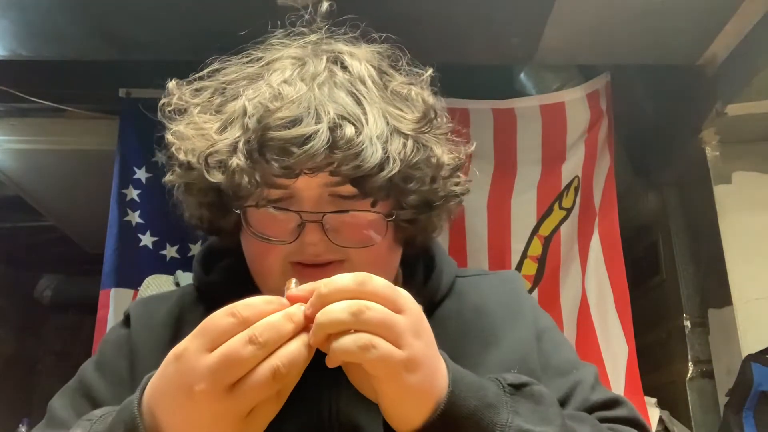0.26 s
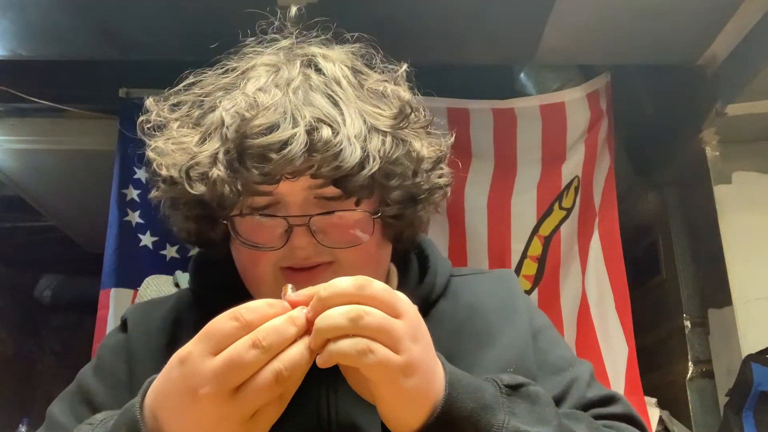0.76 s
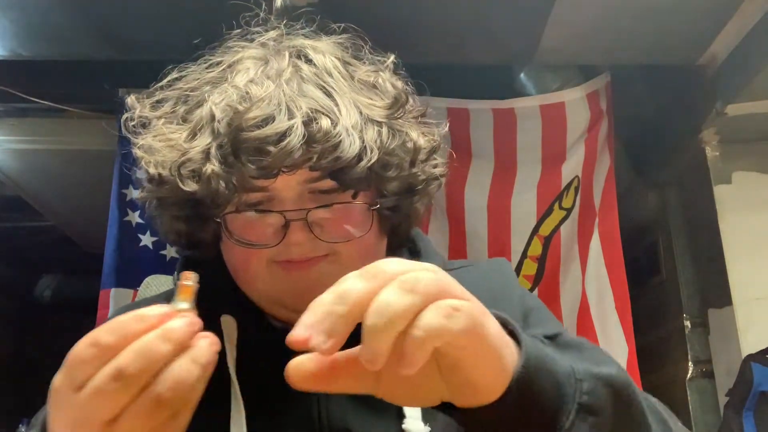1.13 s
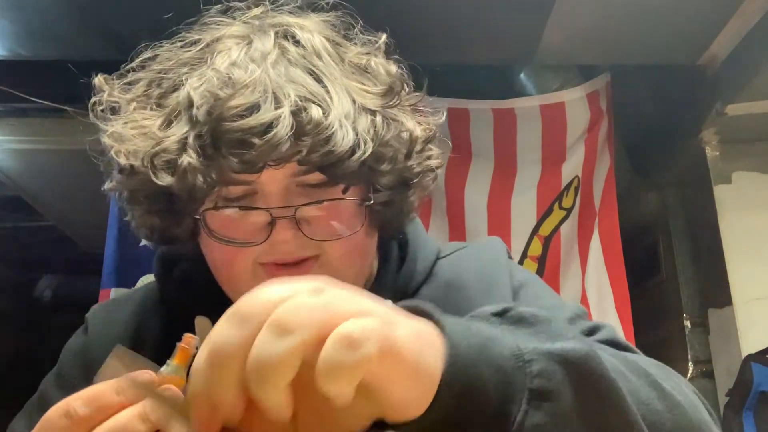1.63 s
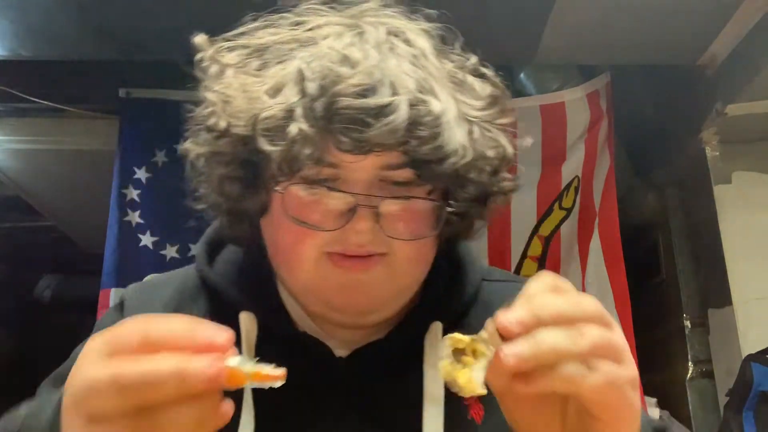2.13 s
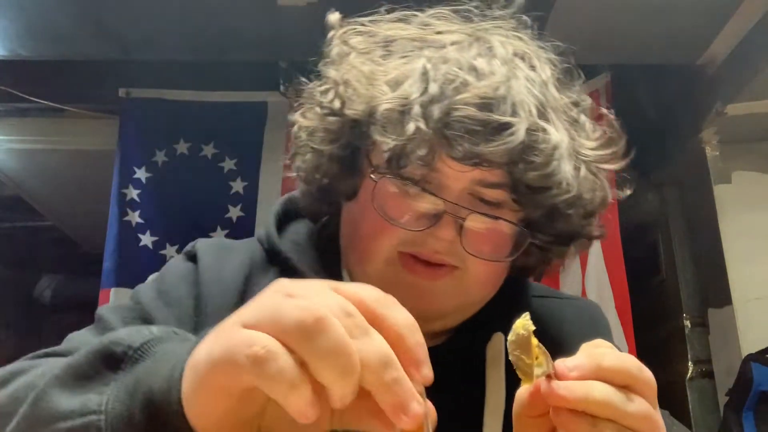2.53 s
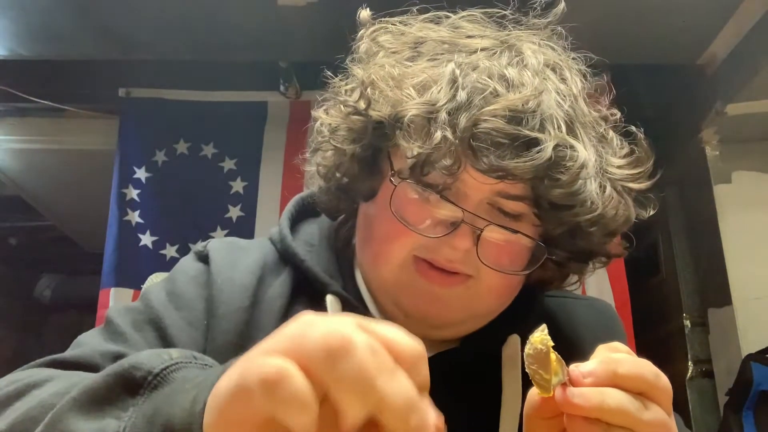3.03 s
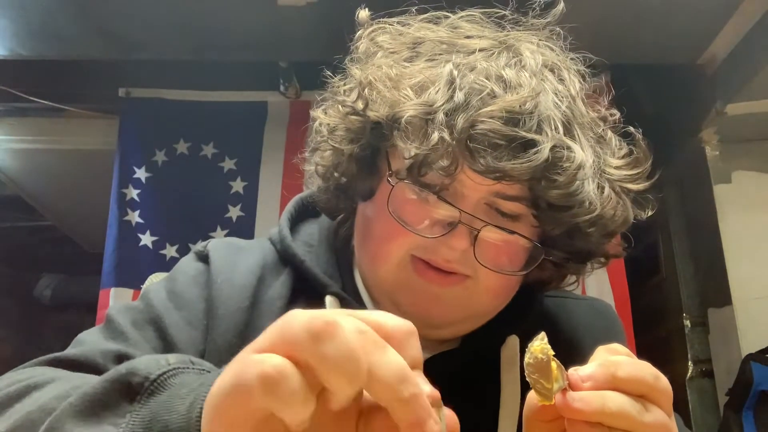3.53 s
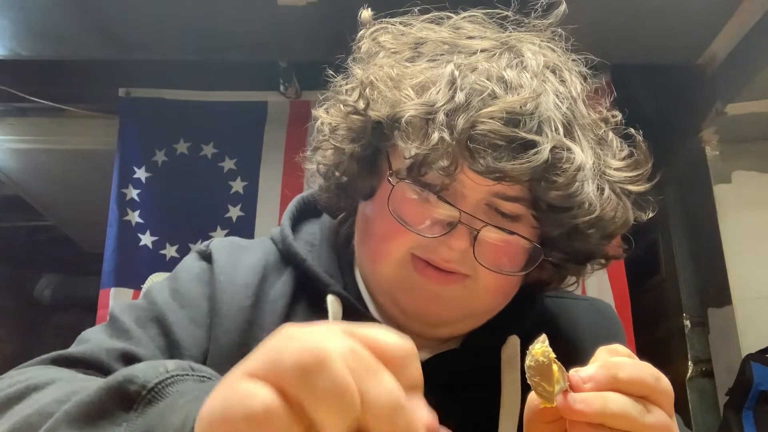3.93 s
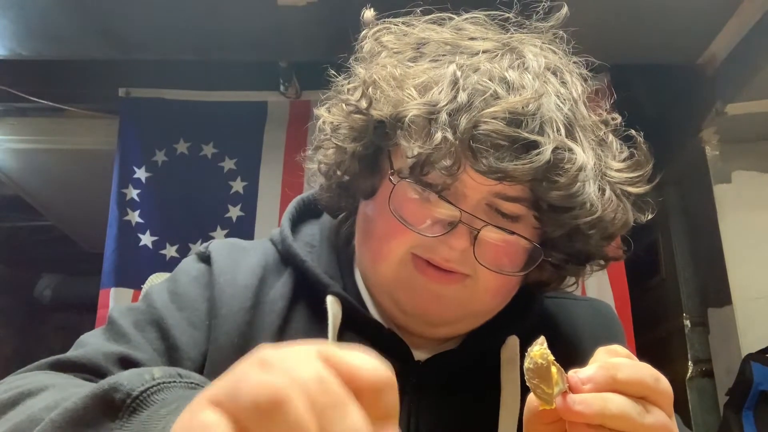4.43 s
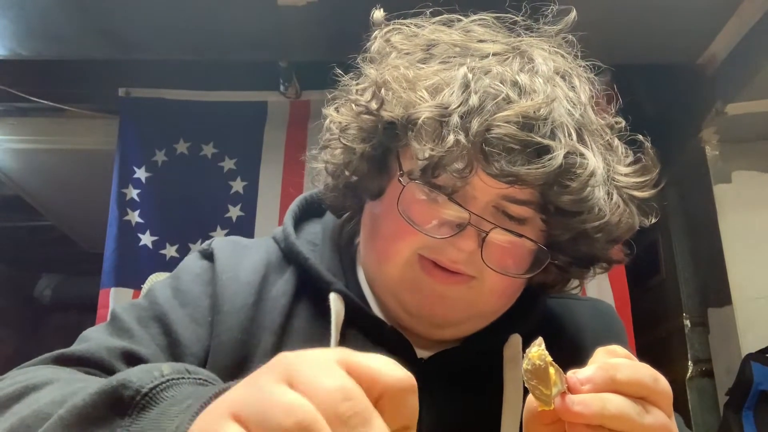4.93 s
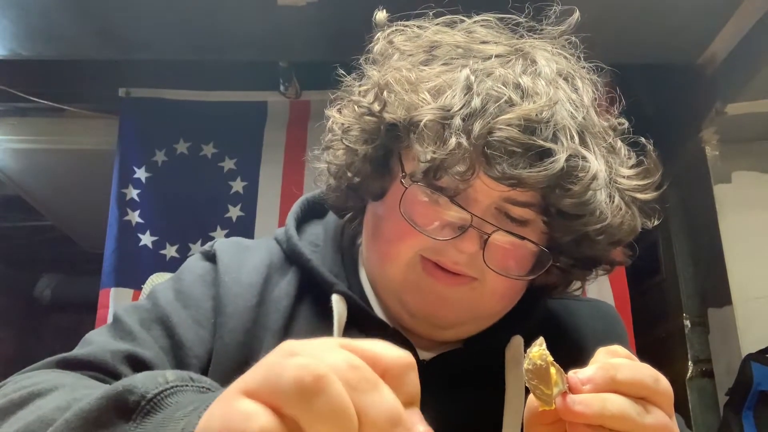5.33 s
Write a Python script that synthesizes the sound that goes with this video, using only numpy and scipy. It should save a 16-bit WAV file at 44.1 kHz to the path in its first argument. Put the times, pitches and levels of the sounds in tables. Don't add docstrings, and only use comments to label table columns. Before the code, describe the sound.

Quiet room with low rumble, small handling rustles and a faint bottle clink, then fourteen quick hard raps of a small object on a table.

```python
import sys
import numpy as np
from scipy import signal
from scipy.fft import rfft, irfft, next_fast_len
from scipy.io import wavfile
from scipy.ndimage import uniform_filter1d

SR = 44100
rng = np.random.default_rng(int(sys.argv[2]) if len(sys.argv) > 2 else 0)


def ratio_of_db(decibels):
    return 10 ** (np.asarray(decibels, float) / 20)


def inscribe(sig):
    pcm = np.round(np.clip(np.atleast_2d(sig).T, -1, 1) * 32767)
    wavfile.write(sys.argv[1], SR, pcm.astype(np.int16))


N = 245637
PAD = next_fast_len(N + SR)
HZ = np.maximum(np.fft.rfftfreq(PAD, 1 / SR), 1)

# frequency in Hz, level in dB per Hz.
RUMBLE = [(12, -43), (20, -12), (43, -1), (76, 4.5), (88, -9), (97, -24.5), (120, -39), (160, -58.5),
          (260, -120)]
HISS = [(60, -42), (100, -2), (315, -17), (600, -21.5), (1100, -24.5), (5400, -31), (8200, -31.5),
        (8500, -43.5), (9500, -45.5), (9800, -36), (14300, -37.5), (14800, -49.5), (17000, -63)]
RUMBLE_DB, HISS_DB = -66.5, -79.5
SWELLS_PER_S, SWELL_DB = 9, 3.5
# middle in seconds, length in seconds, peak in dB.
LEANS = [
    (1.04, 0.032, -57),
    (1.55, 0.51, -61.5),
    (2.72, .12, -62),
]

# middle in seconds, length in seconds, peak in dB.
BUMPS = [
    (1.18, 0.063, -76),
    (1.4, 0.045, -61.5),
    (1.49, 0.13, -57),
    (1.63, 0.19, -67),
    (2.05, 0.34, -66),
    (2.58, 0.07, -73),
    (2.72, 0.062, -74),
]
RUBS = [
    (1.42, 0.17, -72),
    (1.8, 0.22, -81),
    (2.14, 0.26, -77.5),
    (2.67, 0.13, -82),
]
SCUFFS = [
    (.89, .02, -84),
    (1.3, 0.08, -88),
    (1.4, 0.1, -76.5),
    (2.01, 0.087, -82),
    (2.4, 0.46, -93),
    (2.59, .06, -93),
    (2.67, 0.15, -80),
]
SWISHES = [
    (1.27, .12, -89),
    (1.39, .03, -86),
    (1.47, .08, -83),
    (2.67, .03, -90),
]
RESTLESS_DB = -96.5, -106, -101, -104

# frequency in Hz, level in dB, t60 in seconds.
ROOM = [(60, -14.5, 0.14), (153, -11, 0.42), (297, -10, 0.1), (467, -7, 0.12), (1500, -24, 0.2),
        (4200, -12, .18), (6760, -13.5, 0.14), (11500, -29.5, 0.11)]
# frequency in Hz, phase lead in radians.
PORT_PHASE = [(30, 0.18), (60, 0.42), (125, 1.4), (250, 2.5), (500, 2.15), (700, 1.8), (1100, 1.4),
              (1400, 0.9), (1800, 5.46), (2300, 6.93), (2800, 8.33), (4000, 4.17), (6400, 4.82),
              (9000, 3.8), (13000, 0.1)]
# frequency in Hz, left minus right in dB.
BALANCE_DB = [(40, -2), (80, -5), (140, -2), (200, -4), (300, -2), (800, -1), (1050, 8), (1800, 6),
              (2300, 7), (3200, 8), (4500, 3), (6000, 1), (16000, 0)]
LATE_CYCLES = 2.1

# start in seconds, peak in dB, pitch in Hz, t60 in seconds.
TAPS = [(0.887, -55, 1430, 0.043), (.885, -63, 3500, 0.011), (1.398, -45, 6300, 0.023),
        (1.698, -52, 8700, .015), (1.746, -57, 560, 0.079), (1.873, -49.5, 500, 0.036),
        (2.002, -74, 1300, 0.052), (2.125, -79.5, 513, .04), (2.591, -57, 890, 0.071),
        (2.662, -42, 837, 0.083), (2.689, -56, 1000, 0.11), (2.668, -62, 3100, 0.032)]
# frequency in Hz, level in dB, t60 in seconds.
CLINK = [(870, -3, .12), (1850, 0, .06), (2200, -14, .1), (3250, -8, .15), (4100, -7, .06), (5000, -1, .05),
         (5650, -4, .14), (6250, -2, .06), (8000, -16, .06)]
CLINK_S, CLINK_DB = 1.442, -57

# start in seconds, body in dB, tip contact in dB, push into the board in dB,
# lean from low knock to high edge in dB.
BLOWS = [(2.9007, -28, -14, -22, -6), (3.1285, -24.5, -12.5, -18, -4), (3.357, -27.5, -15, -19, -6),
         (3.5889, -26.5, -18.5, -25, -0.5), (3.8138, -20, -15.5, -23, -9), (4.0246, -18, -15.5, -28, -1.5),
         (4.2253, -16.5, -16, -27, 1.5), (4.4086, -16.5, -17.5, -29.5, 3.5), (4.57, -16.5, -19.5, -31, 1),
         (4.721, -16.5, -19.5, -30, -2), (4.8857, -17.5, -19, -30.5, -2), (5.057, -20, -17.5, -27.5, -11),
         (5.23, -29.5, -21, -29, -5), (5.3808, -23, -21, -23.5, -6)]
# frequency in Hz, level in dB,
# t60 in seconds.
TICK = [(4204, -6.5, 0.026), (4763, -6, 0.028), (5270, -9.5, 0.034), (5940, -2, 0.018), (6310, 3.5, 0.0091),
        (7690, -3.5, 0.0056), (8920, -12.5, 0.034), (9590, 0.5, 0.01)]
HOLLOW = [(412, -12, 0.062), (483.8, 5, 0.051), (637.7, 8.5, 0.056), (753.5, -2.5, 0.067)]
KNOCK = [(892, -10, 0.048), (1084, 10.5, 0.02), (1200, -4, 0.032), (1440, 4, 0.018)]
CLACK = [(1513, 1, 0.019), (1620, 2.5, 0.036), (1798, 11.1, 0.015), (1951, 1, 0.018), (2078, 0.67, 0.016)]
EDGE = [(2214, 0.5, 0.032), (2506, -1, 0.01), (2734, 3, 0.017), (2910, -1, 0.029), (3156, -6.5, 0.03),
        (3732, -6.5, 0.036)]
THUMP = [(135, -3, .12), (160, -4, .17), (190, -6, .12), (235, -2, .13), (260, -13, .1)]
BOOM = [(55, -4, .22), (72, -3, .22), (88, -5, .22)]
CUTLERY = [(441, -15, .5), (560, -10, .3), (969, -3, .36), (1055, -5, .32), (1357, -4, .28),
           (1604, -16, .5), (2439, -6, .18), (2606, -11, .29), (3138, -16, .29), (5679, 0, .2)]
BOWL = [(2067, -9, .3), (2143, -7, .3), (2191, 0, .36)]
# start in seconds, level in dB, #
# frequency in Hz, t60 in seconds.
SETTLE = [
    (3.65, -52, 165, .3),
    (5.262, -36, 160, .2),
    (5.43, -46, 150, .2),
    (5.385, -48, 5679, .28),
    (3.816, -54, 5679, .22),
    (5.06, -48, 2191, .4),
    (4.41, -50, 2191, .5),
    (4.575, -52, 2191, .5),
    (4.725, -52, 2191, .5),
]
# frequency in Hz, level in dB.
CRACK = [(2500, -4), (4000, 3.5), (6200, 5), (8500, 7), (9600, -25), (10500, -27)]
SPARKLE = [(9000, -31.5), (10500, -6.5), (13000, -10.5), (15000, -14.5), (16500, -15.5)]
HOLLOW_DB, HOLLOW_FOLLOWS_PUSH = -5, 0.37
CLACK_DB, THUMP_DB, BOOM_DB = 2, 4, -4
CUTLERY_DB, BOWL_DB, WARE_FOLLOWS_PUSH = -38.5, -54.5, 0.38
CRACK_DB, SPARKLE_DB, SPARKLE_GROWTH = -2.4, 18.5, 1.6

# frequency in Hz, left in dB, right in dB.
SMEAR = [(300, -18, -21.5), (1000, -12.5, -16.5), (2400, -12, -27), (3460, -6, -26), (5500, -16.5, -7.5),
         (7220, -8.5, -9), (7700, -65.5, -60)]
FRAME, FRAME_START = 1024, 220
HOLE_FROM_HZ, HOLE_WIDTH_HZ, HOLE_SHARE, HOLE_DB = 7900, 600, .4, -22


def curve(rows, column=1):
    rows = np.array(rows)
    return np.interp(np.log(HZ), np.log(rows[:, 0]), rows[:, column])


def shape(x, gain):
    return irfft(rfft(x, PAD) * gain, PAD)[..., :N]


def unit(x):
    return x / np.sqrt(np.mean(x ** 2))


def band(lo_hz, hi_hz, like):
    a, b = rng.standard_normal((2, N))
    pair = np.array([a, like * a + np.sqrt(1 - min(like ** 2, 1)) * b])
    sos = signal.butter(3, [lo_hz, hi_hz], "band", fs=SR, output="sos")
    return unit(signal.sosfilt(sos, pair))


def flicker(rate, depth_db):
    step = int(SR / rate)
    levels = np.repeat(rng.standard_normal(N // step + 1), step)[:N]
    return ratio_of_db(depth_db * uniform_filter1d(levels, step))


def movements(rows, still_db):
    t = np.arange(N) / SR
    return ratio_of_db(still_db) + sum(ratio_of_db(db) * np.exp(-(3 * (t - s) / length) ** 2) for s, length, db in rows)


def strike(out, s, db, modes, detune, scatter_db, rise):
    hz, mode_db, t60 = np.transpose(modes)[:, :, None]
    luck = rng.standard_normal((len(hz), 2))
    start = int(s * SR)
    t = np.arange(min(int(.5 * SR), N - start)) / SR
    swell = 1 - np.exp(-(t * hz / rise) ** 2)
    ring = swell * np.sin(2 * np.pi * hz * (1 + detune * luck[:, :1]) * t)
    level = ratio_of_db(db + mode_db + scatter_db * luck[:, 1:] - 60 * t / t60)
    out[start:start + len(t)] += (ring * level).sum(0)


def chatter(times, dbs, colour, fast_s, slow_s, slow_share):
    out, t = np.zeros(N), np.arange(SR // 7) / SR
    for s, db in zip(times, dbs):
        fade = np.exp(-t / fast_s) + slow_share * np.exp(-t / slow_s)
        start = int(s * SR)
        out[start:start + len(t)] += ratio_of_db(db) * rng.standard_normal(len(t)) * fade
    return shape(out, ratio_of_db(curve(colour)))


def rumble_and_hiss():
    a, b = (shape(rng.standard_normal(N), ratio_of_db(curve(RUMBLE))) for _ in range(2))
    rumble = unit(np.array([1.3 * a + 0.3 * b, a - 0.3 * b]))
    rumble = movements(LEANS, RUMBLE_DB) * flicker(SWELLS_PER_S, SWELL_DB) * rumble
    hiss = unit(shape(rng.standard_normal((2, N)), ratio_of_db(curve(HISS))))
    return rumble + ratio_of_db(HISS_DB) * hiss


def hands():
    bump, rub, scuff, swish = map(movements, (BUMPS, RUBS, SCUFFS, SWISHES), RESTLESS_DB)
    out = bump * flicker(30, depth_db=4) * band(115, 180, like=-.3)
    out += rub * flicker(60, depth_db=4) * band(300, 620, like=.2)
    out += scuff * flicker(60, depth_db=6.5) * band(750, 1500, like=.2)
    return out + swish * flicker(42, depth_db=3) * band(5000, 6800, like=.2)


def room(x):
    t, rows, tail = np.arange(N) / SR, np.array(ROOM), 0
    for hz in 70 * 2 ** np.arange(0, 8, .5):
        db, t60 = (np.interp(np.log(hz), np.log(rows[:, 0]), rows[:, k]) for k in (1, 2))
        fade = ratio_of_db(np.maximum(-60 * t / t60, -200)) * (1 - np.exp(-t / .003))
        near = np.exp(-(np.log2(HZ / hz) / 0.5) ** 2)
        noise = rfft(fade * rng.standard_normal((2, N)), PAD) / np.sqrt(np.sum(fade ** 2))
        tail = tail + ratio_of_db(db) * near * noise
    return shape(x, tail)


def through_table(x):
    late = np.exp(-2j * np.pi * LATE_CYCLES * np.log((HZ + 40) / (SR / 2)))
    lean = ratio_of_db(curve(BALANCE_DB) / 2)
    left = shape(x, late * lean)
    right = shape(x, late / lean * np.exp(1j * curve(PORT_PHASE)))
    return np.array([left, right])


def taps_and_clink():
    out = np.zeros(N)
    for s, db, hz, t60 in TAPS:
        modes = [(hz * k, -3, max(t60, .005)) for k in (.9, 1, 1.13)]
        strike(out, s, db - 15.0, modes, .02, 2, rise=1.04)
    strike(out, CLINK_S, CLINK_DB, CLINK, 0, 0, rise=0.87)
    return out + chatter([CLINK_S], [-64], CRACK, 0.003, .02, 0.4)


def blows():
    out = np.zeros(N)
    for s, body, tip, push, lean in BLOWS:
        knock, edge = body - lean / 2, body + lean / 2
        hollow = knock + HOLLOW_FOLLOWS_PUSH * (push - knock) + HOLLOW_DB
        levels = (tip, hollow, knock, body + CLACK_DB, edge)
        for db, modes in zip(levels, (TICK, HOLLOW, KNOCK, CLACK, EDGE)):
            strike(out, s, db, modes, .02, 1.3, rise=.6)
        strike(out, s, push + THUMP_DB, THUMP, .03, 2, rise=.8)
        strike(out, s, push + BOOM_DB, BOOM, .04, 1.5, rise=.6)
        strike(out, s, CUTLERY_DB + WARE_FOLLOWS_PUSH * push, CUTLERY, .001, 3, rise=4)
        strike(out, s, BOWL_DB, BOWL, .001, 2, rise=4)
    for s, db, hz, t60 in SETTLE:
        strike(out, s, db, [(hz, -3, t60)], 0, 0, rise=0.53)
    s, _, tip = np.transpose(BLOWS)[:3]
    out += chatter(s + .0005, tip + CRACK_DB, CRACK, .0018, .01, .15)
    return out + chatter(s + 0.00035, SPARKLE_GROWTH * tip + SPARKLE_DB, SPARKLE, 0.0002, 0.018, 0.035)


def scene():
    direct = through_table(blows() + taps_and_clink())
    return direct + room(direct) + hands() + rumble_and_hiss()


def smear_ahead(x):
    before = np.arange(PAD)[::-1] / SR
    ahead = np.exp(-before / 0.0045) + 0.072 * np.exp(-before / 0.012)
    smear = rfft(ahead * rng.standard_normal((2, PAD))) / np.sqrt(np.sum(ahead ** 2))
    smear *= ratio_of_db([curve(SMEAR, 1), curve(SMEAR, 2)])
    gate = np.ones(N)
    for s, *_ in BLOWS:
        start = int(((s - .01) * SR - FRAME_START) // FRAME) * FRAME + FRAME_START
        gate[start - 2 * FRAME:start] = 0
    return x + uniform_filter1d(gate, size=500) * shape(x, smear)


def treble_holes(x):
    hz, t, z = signal.stft(x, SR, nperseg=FRAME, noverlap=FRAME // 2)
    since = t[:, None] - np.array(BLOWS)[:, 0]
    tail = ((since > .017) & (since < .12)).any(1)
    patch = np.maximum((hz - HOLE_FROM_HZ) // HOLE_WIDTH_HZ + 1, 0).astype(int)
    draw = rng.random((patch.max() + 1, len(t)))
    dropped = draw[patch][:, np.arange(len(t)) // 2] < HOLE_SHARE
    z = z * np.where(dropped & tail & (patch > 0)[:, None], ratio_of_db(HOLE_DB), 1)
    return signal.istft(z, SR, nperseg=FRAME, noverlap=FRAME // 2)[1][:, :N]


def top_cut(x):
    return signal.sosfilt(signal.butter(12, 17150, fs=SR, output="sos"), x)


def record(dry):
    wet = smear_ahead(dry)
    wet = treble_holes(np.tanh(1.554 * wet) / 1.08)
    wet = signal.sosfilt(signal.butter(2, 46, "high", fs=SR, output="sos"), wet)
    wet = signal.sosfilt(signal.ellip(6, .2, 70, 15700, fs=SR, output="sos"), wet)
    return top_cut(wet)


dry = scene()
out = record(dry)
inscribe(out)
```